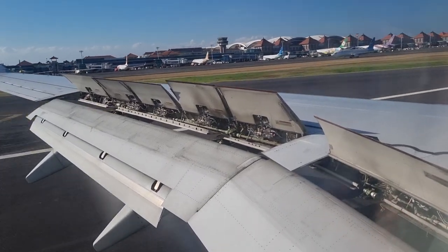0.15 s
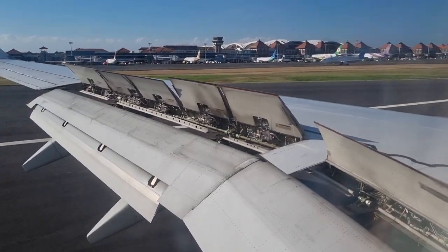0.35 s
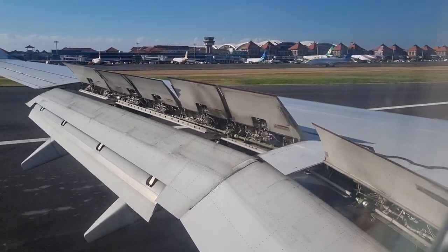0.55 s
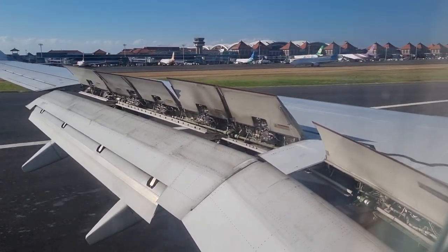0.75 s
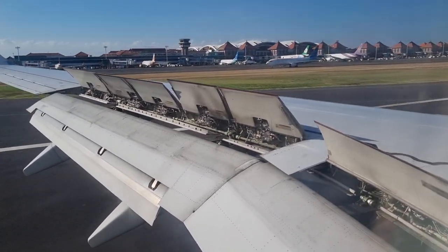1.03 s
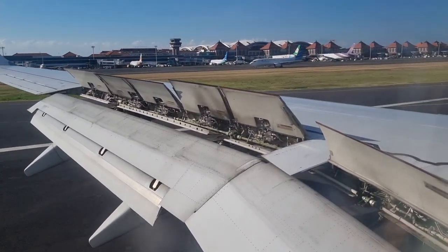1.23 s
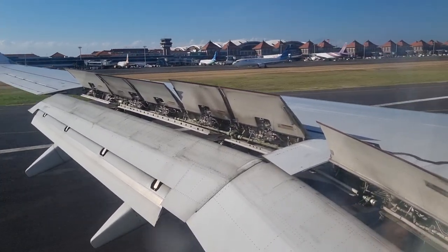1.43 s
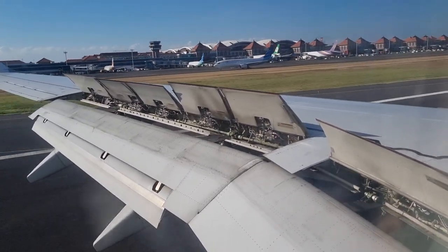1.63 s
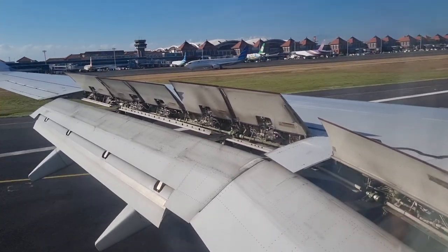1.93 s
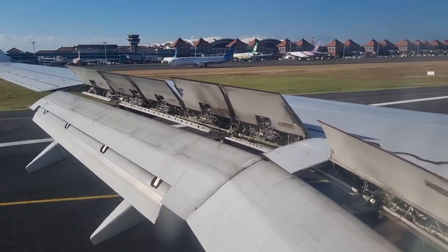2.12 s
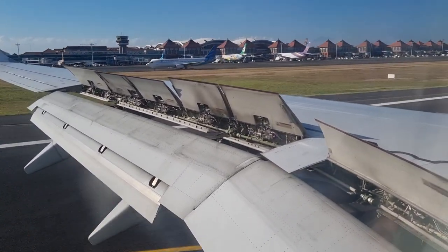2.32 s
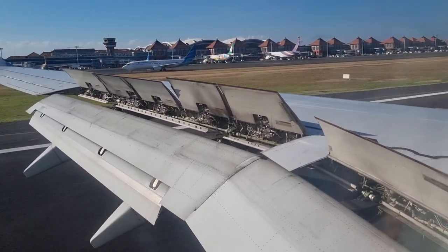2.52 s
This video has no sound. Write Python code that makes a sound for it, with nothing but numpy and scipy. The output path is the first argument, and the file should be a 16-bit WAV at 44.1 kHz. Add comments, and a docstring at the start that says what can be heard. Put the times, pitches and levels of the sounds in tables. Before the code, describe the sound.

Airliner landing roll from a cabin seat: heavy uneven low rumble, muffled roar, small plastic ticks

```python
"""Low rumble swells inside an airliner cabin during the landing roll: three narrow low noises near 69, 52
and 93 Hz, each on its own level curve, over a cabin lining part and a broad part at fixed levels.
Airflow and engines roar through the wall as smooth coloured noise. Loose trim to the right buzzes in
tiny random contacts, snaps faintly and ticks now and then: a blow and a scrape through dull resonances.
A phone with two microphone ports listens; its limiter holds loud peaks down."""
import sys
import numpy as np
from scipy import signal
from scipy.fft import rfft, irfft, next_fast_len
from scipy.io import wavfile
from scipy.ndimage import uniform_filter1d, minimum_filter1d, map_coordinates

SR = 44100
rng = np.random.default_rng(int(sys.argv[2]) if len(sys.argv) > 2 else 0)


def ratio_of_db(decibels):
    """Turn decibels (scalar or array-like) into linear amplitude factors; 0 dB maps to 1."""
    return 10 ** (np.asarray(decibels, float) / 20)


def log_audio(samples):
    """Write samples as a 16-bit WAV file to the path given in sys.argv[1]."""
    # one column per channel
    frames = np.atleast_2d(samples).T
    # limit to full scale, then quantise
    limited = np.clip(frames, -1, 1)
    pcm = np.round(limited * 32767).astype(np.int16)
    wavfile.write(sys.argv[1], SR, pcm)


N = 117747


def unit(x):
    """Scale to rms 1."""
    return x / np.sqrt(np.mean(x ** 2) + 1e-20)


def along(points, hz):
    """Interpolate (Hz, value) points on a log frequency axis."""
    point_hz, value = np.transpose(points)
    return np.interp(np.log(hz + 1), np.log(point_hz + 1), value)


def curve(rows, column=1):
    """One value per sample from one column of timed rows."""
    rows = np.array(rows)
    return np.interp(np.arange(N) / SR, rows[:, 0], rows[:, column])


def wobble(rate_hz):
    """Smooth random curve with rate_hz knots a second."""
    return map_coordinates(rng.standard_normal(400), [np.arange(N) * rate_hz / SR])


def filtered(x, response):
    """Multiply the spectrum of x by a response of frequency."""
    size = next_fast_len(N + SR // 4)
    spectrum = rfft(x, size) * response(np.fft.rfftfreq(size, 1 / SR))
    return irfft(spectrum, size)[..., :N]


def resonances(modes, hz):
    """Root-sum-square of squared resonator magnitudes, so a mode's dB counts twice."""
    total = 0
    for centre, width, db in modes:
        mode = ratio_of_db(db) * hz * width / (centre * centre - hz * hz + 1j * hz * width)
        total = total + np.abs(mode) ** 4
    return np.sqrt(total)


def noise(patchy_db):
    """Two noises sharing time-frequency patches of random gain."""
    z = signal.stft(rng.standard_normal((2, N)), nperseg=512)[2]
    field = rng.standard_normal(z.shape[1:])
    field = uniform_filter1d(uniform_filter1d(field, size=8, axis=0), size=10, axis=1)
    return signal.istft(z * ratio_of_db(patchy_db * unit(field)), nperseg=512)[1][:, :N]


# Port balance. Each row: frequency in Hz, left minus right in dB.
PORT_BALANCE = [(60, -4), (110, -3.5), (200, -4), (380, -4.5), (700, -1), (1290, -1.5), (2380, -4),
                (4400, -10.5), (8120, -8), (15000, -1)]


def lean(pair):
    """The right port hears more, by an amount that varies with frequency."""
    return filtered(pair, lambda hz: ratio_of_db(np.outer([.5, -.5], along(PORT_BALANCE, hz))))


# Likeness of the ports' cabin sound. Each row: frequency in Hz, likeness 0-1.
PORT_LIKENESS = [(60, 0.98), (200, .99), (330, 0.9), (440, 0.21), (530, 0.7), (700, 0.34), (880, 0),
                 (1000, 0.16), (1170, 0.63), (1400, 0.64), (1700, 0.23), (2300, 0.34), (4500, 0.35),
                 (15000, 0)]
# Phase between the ports. Each row: frequency in Hz, left lead in radians.
PORT_LEAD = [(0, 0), (400, 0.32), (520, -2), (690, -3), (900, -1), (1170, -3), (1450, -3), (2760, -5),
             (4480, -3.5), (7580, -5.5), (15400, -1.5)]


def ports(pair, gain):
    """Colour two unrelated signals and mix them to the ports' likeness, phase and balance."""
    like = lambda hz: np.clip(along(PORT_LIKENESS, hz), 0, 1)
    right, other = filtered(pair, gain)
    shared = filtered(right, lambda hz: like(hz) * np.exp(1j * along(PORT_LEAD, hz)))
    unshared = filtered(other, lambda hz: np.sqrt(1 - like(hz) ** 2))
    return lean(np.array([shared + unshared, right]))


# Roar spectrum before levelling. Each row: frequency in Hz, relative density in dB per Hz.
ROAR_COLOUR = [(260, -15.5), (450, -5.5), (514, -1.5), (633, -7.5), (1000, -11.5), (1200, -13.5),
               (1390, -15), (2340, -23), (6430, -34), (7350, -33), (8400, -44.5), (12500, -45.5),
               (15700, -58)]
# Wall panel resonances. Each row: centre in Hz, half-amplitude width in Hz, half the peak gain in dB.
WALL_MODES = [(1005, 24, -3), (1390, 135, -1.5), (2000, 290, -5.5)]


def roar():
    """Airflow and engine noise, coloured by wall resonances, with a slight level wobble."""
    colour = lambda hz: ratio_of_db(along(ROAR_COLOUR, hz)) * (1 + resonances(WALL_MODES, hz))
    level_db = -31.5 + 0.17 * wobble(6.4) + 0.12 * wobble(12)
    return ratio_of_db(level_db) * unit(ports(noise(patchy_db=1.01), colour))


# Trim buzz strength, also followed by the crackle. Each row: time in seconds, relative strength in dB.
BUZZ_STRENGTH = [(0, -55), (.1, -53.5), (.18, -58), (.27, -52.5), (.42, -62.5), (.56, -57), (.66, -54.5),
                 (.73, -59), (.82, -56), (.96, -59.5), (1.1, -58), (1.2, -53.5), (1.3, -57), (1.42, -59.5),
                 (1.65, -60), (1.8, -57), (1.9, -53.5), (2.0, -54.5), (2.07, -58), (2.16, -55.5),
                 (2.26, -51.5), (2.35, -65), (2.43, -56.5), (2.5, -59.5), (2.6, -53.5), (2.67, -53)]
# Buzz spectrum before levelling. Each row: frequency in Hz, relative gain in dB.
BUZZ_SPECTRUM = [(1500, -1.5), (3000, -5), (5500, 1.5), (6800, 1), (7600, -5.5), (8600, -9.5),
                 (12000, -12.5), (15800, -14)]


def buzz():
    """Dense random contacts of uneven size, each a short decaying noise grain."""
    contacts_per_s, spread_db, lift_db, fade_t60_s = 3500, 1.5, 8.5, 0.014
    draw = rng.random((2, N))
    size = ratio_of_db(spread_db * np.log(draw[1] + 0.0033))
    hits = (draw[0] < contacts_per_s / SR) * size
    smear = ratio_of_db(-60 * np.arange(200) / SR / fade_t60_s)
    grains = signal.fftconvolve(hits, smear)[:N] * rng.standard_normal((2, N))
    body = unit(ports(grains, lambda hz: ratio_of_db(along(BUZZ_SPECTRUM, hz))))
    level_db = curve(BUZZ_STRENGTH) + lift_db + .6 * wobble(14) + 1.2 * wobble(60)
    return ratio_of_db(level_db) * body


def crackle():
    """Tiny high snaps of the trim at random moments and sides, louder when it buzzes."""
    count, base_hz, base_db, life_s = 130, 12500, -44, .0004
    draw, t = rng.random((count, 4)), np.arange(SR // 200) / SR
    start = (draw[:, 0] * N).astype(int)
    buzz_db = curve(BUZZ_STRENGTH)
    size = ratio_of_db(base_db + buzz_db[start] - buzz_db.mean() - 9.7 * draw[:, 1])
    hz = base_hz * (.8 + .45 * draw[:, 2])
    envelope = (t / life_s) * np.exp(1 - t / life_s)
    snaps = size[:, None] * envelope * np.sin(2 * np.pi * np.outer(hz, t))
    at = (start[:, None] + np.arange(len(t))).ravel()
    sides = draw[:, 3], 1 - draw[:, 3]
    return np.array([np.bincount(at, (snaps * side[:, None]).ravel(), N + len(t))[:N] for side in sides])


# Dull plastic resonances. Each row: centre in Hz, width in Hz, gain in dB.
TRIM_MODES = [(2300, 900, -18), (3550, 450, -4), (4750, 700, -3), (5250, 600, -2), (5830, 550, -1),
              (6600, 800, -6), (7700, 900, -10), (9500, 1800, -16), (11800, 2500, -16), (14500, 2000, -25)]


def trim_body(hz):
    """Trim resonances of alternating sign, with a notch where the trim barely radiates."""
    node_hz, node_width_hz = 4100, 400
    body = 0
    for k, (centre, width, db) in enumerate(TRIM_MODES):
        mode = 1j * hz * width / (centre * centre - hz * hz + 1j * hz * width)
        body = body + (-1) ** k * ratio_of_db(db) * mode
    off_node = node_hz ** 2 - hz * hz
    return body * off_node / (off_node + 1j * hz * node_width_hz)


# Trim ticks. Each row: start in seconds, relative level in dB, brightness in dB per octave of (Hz + 500),
# scrape length before its fall in ms.
TICK_EVENTS = [(0.0834, -41, -4, 3), (0.128, -43.5, -5, 2.7), (.2209, -45, 0, 3), (.612, -47, 4, 2),
               (.65, -47, 1, 2), (0.662, -45.5, 3, 3), (0.7818, -36, 1, 1.4), (1.0512, -40.5, 2, 2.8),
               (1.821, -46, 2, 2), (1.845, -48, 3, 3), (1.8753, -42.5, 5, 2.5), (1.907, -49, 1, 2),
               (2.0218, -34.5, 0, 1.5), (2.09, -32.5, 1, 3), (2.103, -29, -1, 3.4), (2.1163, -27.5, 0, 3.2),
               (2.209, -30, 0, 3.4), (2.2228, -30.5, -1, 3.2), (2.43, -46, 0, 1.8), (2.5456, -44.5, 0, 2)]
# First blow over the scrape, for firm ticks. Rows left, right: level in dB.
FIRST_BLOW_DB = [
    [16],
    [11],
]
# Shading at the far port. Each row: frequency in Hz, gain in dB.
FAR_SHADE = [(2000, 2), (3600, -2), (4300, -4), (5600, -8), (6800, -2), (8500, -3), (12000, -4), (14000, 2)]


def ticks():
    """Each tick is a blow and a short dry scrape through the trim, with a short cabin tail."""
    rise_s, fall_t60_s, cabin_t60_s, cabin_db = .0004, .011, .06, -17
    firm_db = -36  # weaker ticks lose their first blow and ring less
    lift_db = np.array([[4.5], [2.5]])  # left, right
    out, t = np.zeros((2, N + SR)), np.arange(SR // 25) / SR
    hz = np.fft.rfftfreq(len(t), 1 / SR)
    body = trim_body(hz)
    sag_db = np.array([[3], [1.8]]) * t * 1000  # dB per ms: left, right
    surface = rng.standard_normal(sag_db.shape)  # the same rough edge rubs each time
    impulse = np.arange(len(t)) == 4
    for start_s, db, bright_db, ms in TICK_EVENTS:
        fall_db = 60 * np.maximum(t - ms / 1000, 0) / fall_t60_s
        shape = (1 - np.exp(-t / rise_s)) * ratio_of_db(-sag_db - fall_db)
        scrape = shape * np.sign(surface + 0.5 * rng.standard_normal(shape.shape))
        blow = ratio_of_db(FIRST_BLOW_DB) * ratio_of_db(min(db - firm_db, 0)) * impulse
        dull = np.clip((firm_db - db) / 10 + .4, 0, .6)  # flattens the resonances
        colour = body / (np.abs(body) + .02) ** dull * ratio_of_db(bright_db * np.log2((hz + 500) / 6000))
        colour = colour / np.sqrt(np.mean(np.abs(colour) ** 2))
        burst = irfft(rfft(scrape + blow) * colour, len(t))
        out[:, round(start_s * SR):][:, :len(t)] += ratio_of_db(db + lift_db) * burst
    far = filtered(out[0, :N], lambda f: ratio_of_db(along(FAR_SHADE, f)))
    direct = np.array([far, out[1, :N]])
    tail_t = np.arange(SR // 8) / SR
    tail = ratio_of_db(-60 * tail_t / cabin_t60_s) * rng.standard_normal((2, len(tail_t)))
    wet = signal.fftconvolve(direct, tail / np.linalg.norm(tail[0]), axes=1)[:, :N]
    return lean(direct + ratio_of_db(cabin_db) * wet)


def steadied(pair, share):
    """Even out part of the narrow noise's slow random swing, so the level curve sets the swells."""
    swing = np.sqrt(np.abs(uniform_filter1d(np.mean(pair ** 2, axis=0), size=1800)))
    return unit(pair / (swing + 0.088 * swing.mean()) ** share)


# Low rumble swells. Each row: time in seconds, then the levels in dB of the narrow noises
# near 69 Hz, 52 Hz and 93 Hz.
SWELL_LEVELS = [(0.0, -11.5, -14, -14), (0.1, -21, -12.5, -22), (0.18, -12, -14.5, -18),
                (0.21, -8, -32, -47), (0.31, -15.5, -8, -25.5), (0.38, -13.5, -18, -37),
                (0.42, -16.5, -10.5, -20), (1.05, -21.5, -20.5, -17), (1.23, -10.5, -8, -18),
                (1.33, -20.5, -34, -29), (1.36, -10.5, -39, -25), (1.5, -18.5, -18, -14),
                (1.53, -29, -15.5, -21), (1.73, -14, -20, -12), (1.81, -19.5, -30, -16.5),
                (1.87, -10, -24, -13), (1.96, -29, -16.5, -17), (2.0, -14.5, -17.5, -14.5),
                (2.3, -16, -13.5, -20.5), (2.33, -25, -30, -12.5), (2.42, -16, -21, -22),
                (2.47, -12, -13, -15.5), (2.51, -15, -21, -20), (2.58, -29, -12, -20),
                (2.62, -19, -29, -12), (2.66, -32, -14, -18.5)]
# Narrow low noises, then cabin lining, before levelling.
# Each row: centre in Hz, half-amplitude width in Hz, half the peak gain in dB.
NEAR_69_HZ = [(68.7, 18.4, 0)]
NEAR_52_HZ = [(51.6, 18, 0)]
NEAR_93_HZ = [(92.9, 24, 0)]
LINING_MODES = [(192.2, 52, 0.5), (230, 90, -1), (340, 147, -5.5), (515, 60, -10.5)]
# Broad rumble before levelling. Each row: frequency in Hz, relative density in dB per Hz.
BROAD_COLOUR = [(13, -44), (25, -31), (35, -20.5), (53, -12.5), (81, -8.5), (134, -5.5), (193, -8.5),
                (243, -12), (354, -16), (700, -36), (910, -46), (1540, -120)]


def rumble():
    """Three narrow low noises swell on their own curves; lining and a broad part keep fixed levels."""
    lining_db, broad_db = -21, -17
    swells = 0
    for column, modes in enumerate((NEAR_69_HZ, NEAR_52_HZ, NEAR_93_HZ), start=1):
        narrow = ports(noise(patchy_db=.5), lambda hz: resonances(modes, hz))
        swells = swells + ratio_of_db(curve(SWELL_LEVELS, column)) * steadied(narrow, share=.7)
    lining = unit(ports(noise(patchy_db=1.0), lambda hz: resonances(LINING_MODES, hz)))
    broad = unit(ports(noise(patchy_db=1.5), lambda hz: ratio_of_db(along(BROAD_COLOUR, hz))))
    return swells + ratio_of_db(lining_db) * lining + ratio_of_db(broad_db) * broad


def scene():
    """All sources together."""
    return roar() + buzz() + crackle() + ticks() + rumble()


def roll_off(x):
    """The treble ends steeply here."""
    return signal.sosfilt(signal.butter(12, 15820, fs=SR, output="sos"), x)


def record(dry):
    """A fast soft limiter turns both ports down alike, following the louder one's peaks."""
    ceiling, knee, window = 1.05, 4, 441  # full scale, exponent, samples
    peak = -minimum_filter1d(-np.abs(dry).max(0), size=window)
    level = uniform_filter1d(peak, size=window)
    held = dry / (1 + (level / ceiling) ** knee) ** (1 / knee)
    return roll_off(held)


dry = scene()
out = record(dry)
log_audio(out)
```